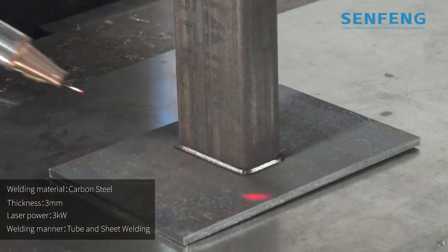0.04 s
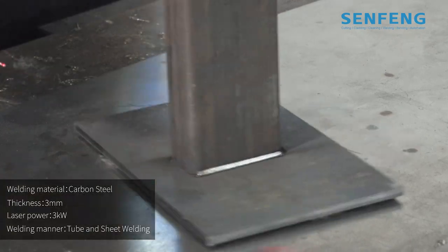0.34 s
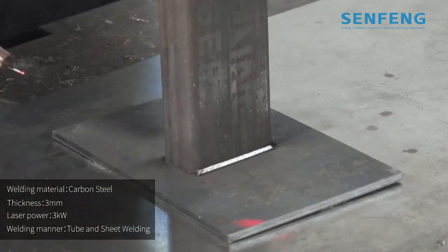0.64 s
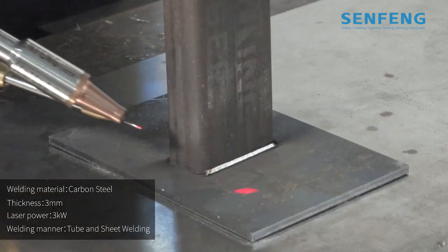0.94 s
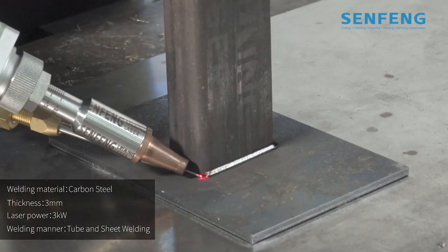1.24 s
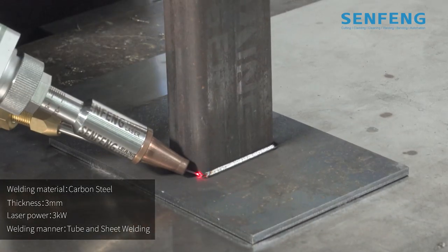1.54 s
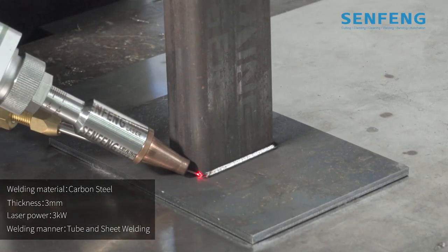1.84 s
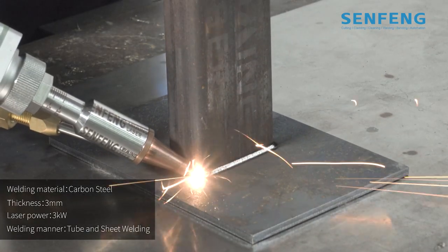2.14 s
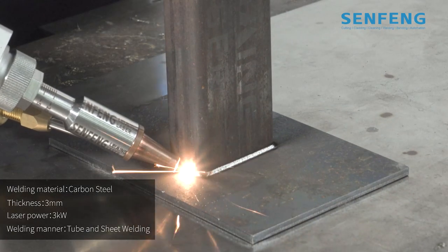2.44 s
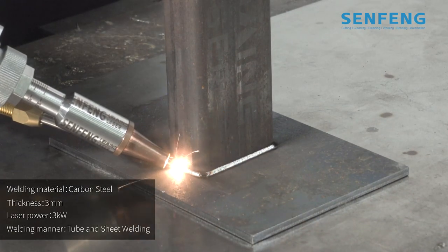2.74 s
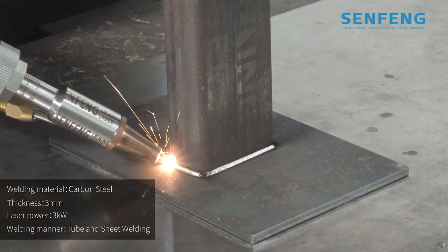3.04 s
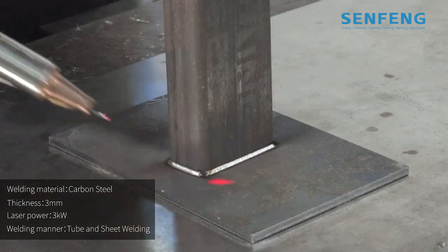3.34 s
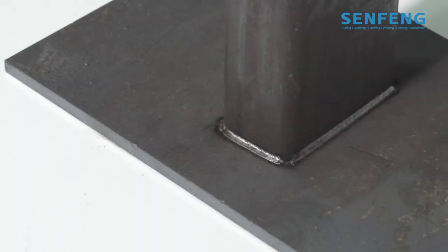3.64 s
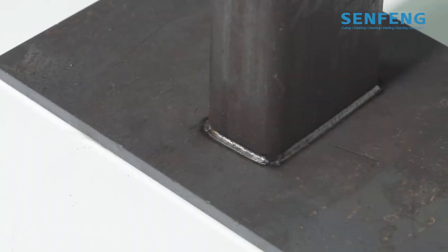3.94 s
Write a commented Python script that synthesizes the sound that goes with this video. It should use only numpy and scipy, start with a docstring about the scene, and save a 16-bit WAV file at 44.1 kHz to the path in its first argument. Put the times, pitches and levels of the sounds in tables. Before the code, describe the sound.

A laser welder hisses brightly for a second, after hissing gas and a steel plate's scrape.

```python
"""Handheld laser welding

Shielding gas hisses from a torch over a faint machine hum while a steel plate scrapes and rings on a
bench. The torch is set on the seam with dull knocks, and the gas whistles in the narrow gap. For about
a second the beam melts the steel, and its vapour makes a bright, fluttering hiss. The torch lifts away,
and the sound drops abruptly to a very faint room tone."""
import sys
import numpy as np
from scipy import signal
from scipy.fft import rfft, irfft, next_fast_len
from scipy.io import wavfile
from scipy.ndimage import map_coordinates

SR = 44100
rng = np.random.default_rng(int(sys.argv[2]) if len(sys.argv) > 2 else 0)


def master_out(mix):
    """Clip the mix to full scale and print it as 16-bit PCM to the path in sys.argv[1]."""
    frames = np.transpose(np.atleast_2d(mix))
    ceiling = np.clip(frames, -1, 1)
    pcm = np.round(ceiling * 32767).astype(np.int16)
    wavfile.write(sys.argv[1], SR, pcm)


N = 176400

# tone colour of the gas jet (frequency [Hz], relative level [dB])
JET_COLOUR = [(40, -67.5), (130, -45), (220, -32.5), (350, -22.5), (650, -9), (1100, -5.5), (2200, -3.5),
              (3200, -4.5), (5200, -4), (9000, -8), (15800, -9)]
# how alike left and right sound, 1 being the same (frequency [Hz], likeness [-1 to 1])
JET_ALIKE = [(100, .92), (400, 0.88), (1800, 0.67), (3500, 0.35), (6500, 0.14), (14000, .3)]
TORCH_ALIKE = [(1000, 0.67), (5000, 0.64), (10000, 0.63), (15000, .82)]
SLIDE_ALIKE = [(200, 0.47), (1800, 0.96), (4500, 0.4), (8000, 0), (14000, -0.46)]
# resonances at the torch (frequency [Hz], width [Hz], relative level [dB], left minus right [dB])
WHISTLE_PEAKS = [(4640, 400, -16, -12), (6840, 500, -11, -3.5), (8750, 300, -22.5, 3.5),
                 (10090, 550, 1.5, -0.5), (10800, 750, -4, 1.5)]  # gas between nozzle and steel
LOW_WHISTLE_PEAKS = [(3117, 400, 0, 0.5)]  # the lowest of these, which swells on its own
NOZZLE_PEAKS = [(13100, 1300, -13, 2.5), (13900, 800, -7.5, 2), (15600, 700, 3, -3)]  # thin top of the nozzle hiss
VAPOUR_PEAKS = [(1130, 310, -9.5, -1), (2080, 210, -10.5, -1), (3030, 360, -10, -2.5),
                (4340, 1100, -14.5, -2.5), (5850, 500, -7.5, -1.5), (6860, 450, -7, -4),
                (7360, 320, -8.5, 3), (8300, 280, -7, 2), (8710, 230, -4.5, 2), (9940, 520, 0, -1.5),
                (10940, 600, -.5, 2), (11820, 760, -2.5, 5.5), (12800, 500, -0.5, -2),
                (13140, 500, -5.5, 0.5), (14100, 600, 3, 1.5), (14700, 450, -2, 5), (15360, 480, 0.5, -9.5)]  # vapour from the melted steel
# how loud each torch sound is as the work goes on (time [s], level [dB])
JET_LEVEL = [(0, -46), (.2, -45.5), (.9, -48), (1.25, -47), (1.8, -46), (2.1, -45.5), (3.1, -45),
             (3.55, -47.5)]
WHISTLE_LEVEL = [(0, -48), (.06, -58), (.16, -66), (.3, -79), (1.2, -69), (1.98, -76), (2.02, -54),
                 (2.065, -46.5), (2.2, -46.5), (3.24, -49.5), (3.31, -42.5), (3.38, -53), (3.41, -56),
                 (3.46, -46.5), (3.52, -59), (3.58, -64)]
LOW_WHISTLE_LEVEL = [(0, -60), (.1, -57), (.2, -72), (1.99, -68), (2.02, -52.5), (2.2, -52.5),
                     (3.25, -55.5), (3.31, -55), (3.37, -50), (3.41, -56), (3.5, -64), (3.57, -68)]
NOZZLE_LEVEL = [(0, -51), (.1, -59), (.2, -67), (1.91, -74), (1.95, -52), (2.1, -55), (3.28, -54.5),
                (3.4, -55), (3.47, -61.5)]
VAPOUR_LEVEL = [(2.08, -68), (2.14, -41.5), (2.19, -38), (2.29, -41.5), (2.42, -37.5), (2.65, -38),
                (3.14, -38), (3.252, -37.5), (3.273, -51), (3.36, -69.5)]
# tones of the welding machine (frequency [Hz], level [dB])
HUM_TONES = [(226, -89.5), (401, -77), (603, -73.5)]
# tone colours of hand and hose, quiet room and sliding plate (frequency [Hz], relative level [dB])
RUSTLE_COLOUR = [(40, -29.5), (130, -18.5), (280, -4), (600, 6.5), (1200, -7.5), (3000, -29)]
ROOM_TONE_COLOUR = [(40, -14), (130, -4), (270, -9.5), (450, -1), (1050, 3.5), (2200, -4.5), (3600, -12.5),
                    (7500, -14.5), (15800, -24.5)]
SLIDE_COLOUR = [(59, -78.5), (100, -49), (544, -13), (702, -5), (1170, -5), (1240, -8), (1500, -3),
                (2610, -1.5), (3160, -1.5), (4820, -1.5), (15800, -16)]
# dull knocks and scuffs (time [s], level [dB], rise [s], time to fade 60 dB [s], centre [Hz])
KNOCKS = [(.036, -45.5, 0.0035, .04, 650), (.066, -47, 0.0067, 0.083, 680), (.119, -48, 0.0021, 0.029, 420),
          (.196, -43, .003, 0.035, 1040), (.218, -45.5, 0.011, 0.072, 900), (.384, -55, 0.0037, .06, 447),
          (.442, -46.5, 0.0026, 0.045, 600), (0.5678, -32.5, 0.0021, 0.037, 720),
          (.581, -51, 0.0023, 0.039, 450), (.681, -43.5, 0.0037, 0.044, 930),
          (.76, -58, 0.0036, 0.031, 550), (.842, -51, .005, 0.055, 930), (.855, -46.5, 0.011, 0.044, 780),
          (.918, -49.5, 0.006, 0.087, 610), (0.933, -42, 0.0061, 0.13, 1420),
          (0.951, -46, 0.0042, 0.065, 650), (1.142, -50.5, 0.018, 0.057, 1010),
          (1.283, -40.5, 0.0055, 0.039, 950), (1.384, -48.5, .025, 0.15, 900),
          (1.45, -56.5, 0.0088, 0.063, 454), (1.535, -44.5, 0.0055, 0.068, 950),
          (1.614, -48, 0.0042, 0.049, 910), (1.721, -47, 0.0077, 0.14, 570),
          (1.742, -43, 0.0075, 0.071, 1100), (1.766, -47, .003, 0.14, 580),
          (1.815, -55.5, 0.0084, 0.48, 550), (1.975, -53.5, 0.012, 0.38, 570),
          (2.013, -48.5, 0.0047, 0.074, 720), (2.05, -53.5, 0.0046, .05, 480),
          (2.335, -53.5, 0.0059, .05, 500), (2.423, -49, 0.0034, 0.046, 650), (2.488, -48, 0.013, 0.2, 560),
          (2.523, -48.5, 0.0026, 0.096, 500), (2.675, -51, 0.016, 0.065, 405),
          (2.705, -45, 0.0035, 0.038, 650), (2.745, -54, 0.0036, 0.068, 430), (2.948, -53, .012, 0.16, 480),
          (3.11, -59, 0.0047, 0.057, 358), (3.165, -56, 0.0068, 0.049, 504),
          (3.271, -48, 0.0053, 0.054, 620), (3.299, -57.5, 0.0043, 0.061, 420)]
# tone colour of a knock (frequency [multiple of the centre], relative level [dB])
KNOCK_COLOUR = [(.06, -44), (.25, -24), (.6, -1), (1.2, 7.5), (1.8, 4.5), (3, -8.5), (8, -50)]
# shoves of the plate (time [s], level [dB], rise [s], fade [dB/s], tilt toward treble [dB/octave])
SHOVES = [(.21, -46, 0.016, 152, 12.5), (.24, -42, 0.0085, 207.5, 18.5), (0.292, -29, 0.032, 71.5, 2),
          (.49, -39.5, 0.046, 68.5, 0)]
# moments when the plate is set ringing (time [s], boost [dB])
RINGS = [(.246, 8), (.315, -2)]
# hard taps on steel (time [s], level [dB], pitch [multiple])
TAPS = [(.569, -42, 0.562), (1.288, -40.5, 0.99), (1.536, -51.5, 0.6), (2.955, -48, 0.6)]
# ringing tones of the steel (frequency [Hz], relative level [dB], time to fade 60 dB [s])
PLATE_TONES = [(3836, -50.5, 0.23), (4020, -48, .15), (4315, -56, 0.37), (4554, -63, .5), (4820, -61, .5)]
TAP_TONES = [(1147, -0.5, 0.059), (1350, -7.5, .05), (1634, -7.5, 0.057), (1990, -6, 0.1)]


def amp(db):
    """Turn decibels into a number to multiply by."""
    return 10 ** (np.asarray(db) / 20)


def unit(x):
    """Scale a sound to an average (rms) strength of 1."""
    return x / np.sqrt(np.mean(x ** 2) + 1e-20)


def clock():
    """The time of each sample, in seconds."""
    return np.arange(N) / SR


def along(points, hz):
    """Read between (frequency, value) points, with octaves evenly spaced."""
    f, v = np.transpose(points)
    return np.interp(np.log(hz + 1e-6), np.log(f), v)


def level(rows):
    """A loudness curve through (time, level) rows, silent outside them."""
    return amp(np.interp(clock(), *np.transpose(rows), left=-140, right=-140))


def wobble(rate):
    """A smooth random curve with `rate` new values a second."""
    values = rng.standard_normal(int(N * rate / SR) + 4)
    return map_coordinates(values, [np.arange(N) * rate / SR], order=2)


def swell(t, rise):
    """A smooth rise from 0 to 1."""
    return np.sin(np.pi / 2 * np.clip(t / rise, 0, 1)) ** 2


def filtered(x, response):
    """Turn each frequency up or down by response(frequency)."""
    n = x.shape[-1]
    padded = next_fast_len(n + 4096, real=True)
    return irfft(rfft(x, padded) * response(np.fft.rfftfreq(padded, 1 / SR)), padded)[..., :n]


def noise(colour, alike, lead_s=0, size=N):
    """Stereo noise of strength 1 with a tone colour; the left side comes lead_s early."""
    hz = np.fft.rfftfreq(size, 1 / SR)
    middle, side = rfft(rng.standard_normal((2, size)))
    spread = np.arccos(np.clip(along(alike, hz), -1, 1)) / 2
    middle, side = np.cos(spread) * middle, np.sin(spread) * side
    left = (middle + side) * np.exp(2j * np.pi * hz * lead_s)
    return unit(irfft(np.array([left, middle - side]) * colour(hz), size))


def torch_noise(peaks, lowest_hz=600):
    """Noise gathered into broad resonances, each leaning to one side."""
    def colour(f):
        power = 0
        for hz, width, db, pan in peaks:
            sides = amp(db + np.array([[pan], [-pan]]) / 2)
            power += (sides / (1 + ((f - hz) / (0.64 * width)) ** 2)) ** 2
        return np.sqrt(power) * f ** 2 / (f ** 2 + lowest_hz ** 2)
    return noise(colour, TORCH_ALIKE, lead_s=.000008)


def gas_jet(flutter_db=0.52, pan_db=-1.4):
    """Shielding gas rushes out in a broad hiss, a little louder on the right."""
    hiss = noise(lambda f: amp(along(JET_COLOUR, f)), JET_ALIKE, lead_s=.00003)
    db = np.interp(clock(), *np.transpose(JET_LEVEL)) + flutter_db * wobble(20)
    return hiss * amp(db + np.array([[pan_db], [-pan_db]]) / 2)


def gas_whistle(waver_db=0.9):
    """Gas resonates in the gap when the nozzle nears the steel, with a thin hiss on top."""
    high = torch_noise(WHISTLE_PEAKS) * level(WHISTLE_LEVEL)
    low = torch_noise(LOW_WHISTLE_PEAKS) * level(LOW_WHISTLE_LEVEL)
    whistle = (high + low) * amp(waver_db * wobble(45))
    thin_hiss = torch_noise(NOZZLE_PEAKS) * level(NOZZLE_LEVEL) * amp(waver_db * wobble(45))
    return whistle + thin_hiss


def machine_hum(drift_radians=0.9, waver_db=3):
    """The welding machine hums in a few unsteady tones."""
    out = np.zeros(N)
    for hz, db in HUM_TONES:
        loudness = amp(db + waver_db * wobble(8.7))
        out += loudness * np.sin(2 * np.pi * hz * clock() + drift_radians * wobble(7))
    return out


def rustle(db=-70.5, swing_db=5):
    """Hand and hose shift with a faint, lumpy noise."""
    rub = noise(lambda f: amp(along(RUSTLE_COLOUR, f)), [(150, 0.94), (700, 0.8)])
    return amp(db) * unit(rub * amp(swing_db * wobble(22)))


def room_tone(db=-88):
    """The very faint, steady noise of the workshop."""
    return amp(db) * noise(lambda f: amp(along(ROOM_TONE_COLOUR, f)), [(200, .8), (5000, .4)])


def knocks(bounce=0.53, bounce_s=0.002815):
    """Hand, torch and plate bump; sound bouncing off the bench makes each thud hollow."""
    out, t = np.zeros((2, N + SR)), np.arange(SR // 4) / SR
    for start, db, rise, fade_s, hz in KNOCKS:
        delay = bounce_s * np.exp(.25 * rng.standard_normal())
        hollow = lambda f: 1 + bounce * np.exp(-2j * np.pi * f * delay)
        colour = lambda f: amp(along(KNOCK_COLOUR, f / hz)) * hollow(f)
        thud = noise(colour, [(150, 1.0), (700, 0.4)], size=len(t))
        loudness = swell(t, rise) * amp(db - 60 * np.maximum(t - rise, 0) / fade_s)
        first = round(start * SR)
        out[:, first:first + len(t)] += thud * loudness
    return out[:, :N]


def room_echo(x, db=-14.5, fade_s=0.23, rise_s=0.0066):
    """The workshop answers a sound with a short, fading echo."""
    t = np.arange(SR // 2) / SR
    tail = noise(np.ones_like, [(300, .7), (2000, 0.23)], size=len(t))
    tail *= amp(-60 * t / fade_s) * np.minimum(t / rise_s, 1)
    return amp(db) * signal.fftconvolve(x, tail / np.linalg.norm(tail[0]), axes=1)[:, :N]


def plate_slides(grain_db=-1.1, pivot_hz=3500, treble_hz=6600, dulling_db_per_s=60.5):
    """Each shove scrapes the plate over the bench; the treble fades first as it slows."""
    out = np.zeros((2, N))
    for start, db, rise, fade, tilt in SHOVES:
        t = np.maximum(clock() - start, 0)
        tilt_db = lambda f: tilt * np.minimum(np.log2((f + 1) / pivot_hz), 1)
        rub = noise(lambda f: amp(along(SLIDE_COLOUR, f) + tilt_db(f)), SLIDE_ALIKE)
        body = filtered(rub, lambda f: 1 / (1 + (f / treble_hz) ** 4))
        slowing_s = np.maximum(t - rise, 0)
        treble = (rub - body) * amp(-dulling_db_per_s * slowing_s)
        out += (body + treble) * swell(t, rise) * amp(db - fade * slowing_s)
    return out * amp(grain_db * wobble(560))


def plate_ring(chatter_radians=0.73, chatter_rate=220):
    """The plate rings roughly as it chatters on the bench."""
    out = np.zeros((2, N))
    for start, db in RINGS:
        t = np.maximum(clock() - start, 0)
        for hz, tone_db, fade_s in PLATE_TONES:
            chatter = chatter_radians * wobble(chatter_rate)
            phase = 2 * np.pi * hz * t + chatter + rng.standard_normal((2, 1))
            out += amp(db + tone_db - 60 * t / fade_s) * swell(t, .003) * np.sin(phase)
    return out


def steel_taps(rise_s=0.0031):
    """Hard taps make the steel ring in a few tones that die quickly."""
    out = np.zeros((2, N))
    for start, db, pitch in TAPS:
        t = np.maximum(clock() - start, 0)
        for hz, tone_db, fade_s in TAP_TONES:
            loudness = amp(db + tone_db - 60 * t / fade_s) * np.minimum(t / rise_s, 1)
            out += loudness * np.sin(2 * np.pi * (pitch * hz * t + rng.random()))
    return out


def weld(sweep_hz=275, surge_db=-0.6, sputter_db=0.5):
    """Vapour hisses and sputters from the melt, pulsing as the beam sweeps across the seam."""
    sweep = 2 * np.pi * sweep_hz * clock()
    pulse = 1 + 0.11 * np.cos(sweep) + 0.091 * np.cos(2 * sweep)
    hiss = torch_noise(VAPOUR_PEAKS)
    flutter = amp(surge_db * wobble(25) + sputter_db * wobble(780))
    return unit(hiss * pulse * flutter) * level(VAPOUR_LEVEL)


def scene(stop_s=3.577, fade_s=0.0059):
    """All the work sounds together, stopping abruptly to leave only the room tone."""
    bumps = knocks() + steel_taps()
    torch = gas_jet() + gas_whistle() + weld()
    plate = plate_slides() + plate_ring()
    work = torch + plate + machine_hum() + rustle() + bumps + room_echo(bumps)
    running = np.clip(1 - (clock() - stop_s) / fade_s, 0, 1)
    return work * running + room_tone()


def record(dry, top_hz=15900, edge_hz=200):
    """Remove the very highest treble, above top_hz."""
    return filtered(dry, lambda hz: swell(top_hz - hz, edge_hz))


dry = scene()
out = record(dry)
master_out(out)
```